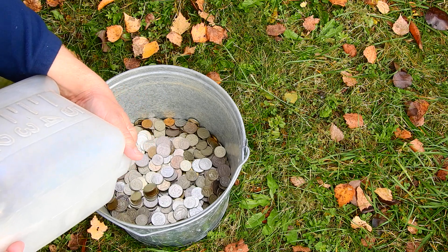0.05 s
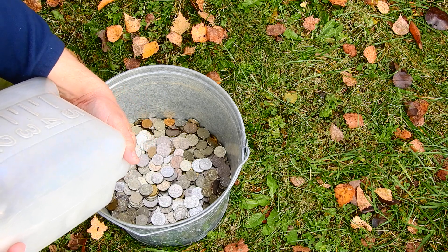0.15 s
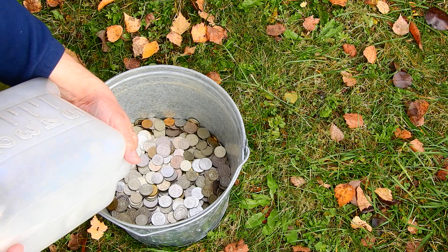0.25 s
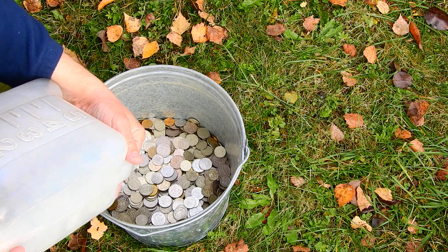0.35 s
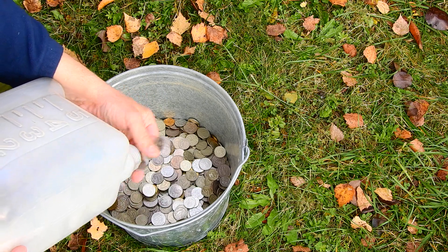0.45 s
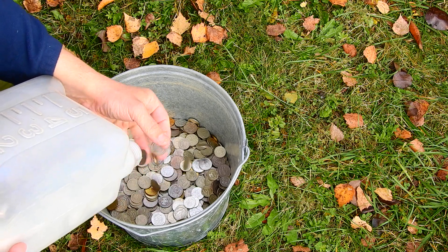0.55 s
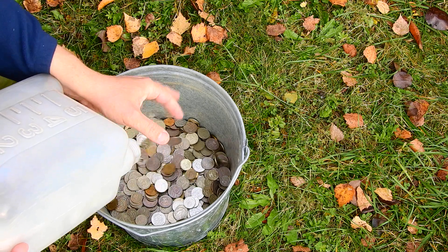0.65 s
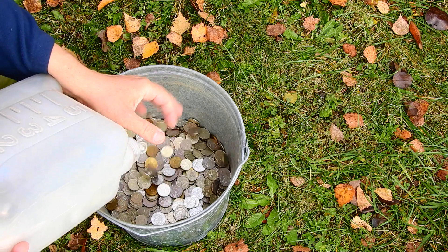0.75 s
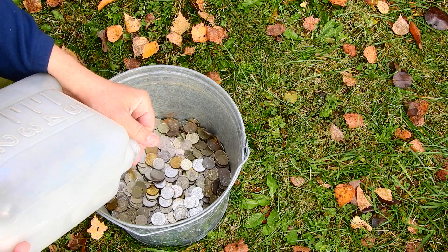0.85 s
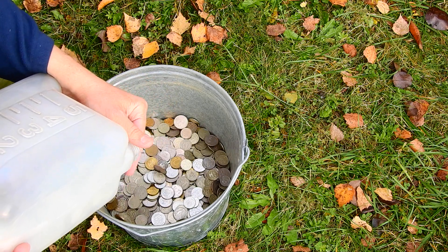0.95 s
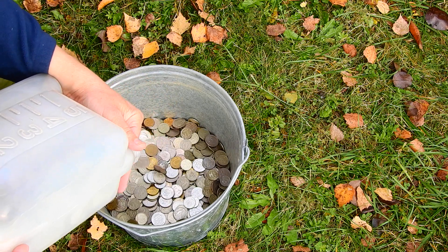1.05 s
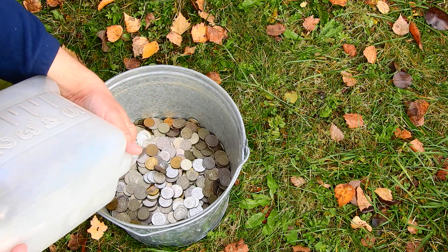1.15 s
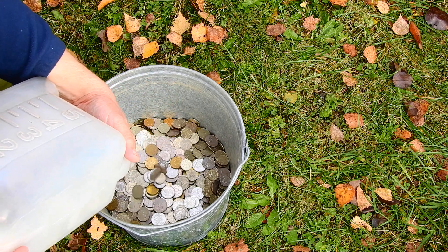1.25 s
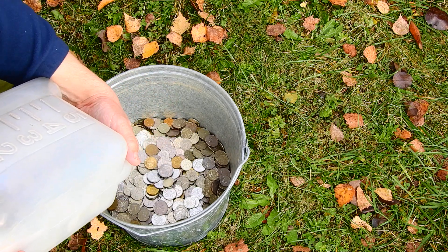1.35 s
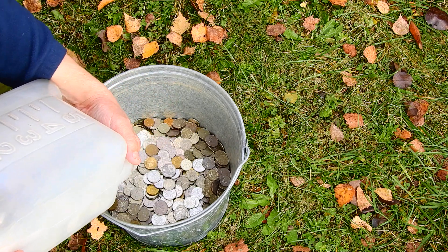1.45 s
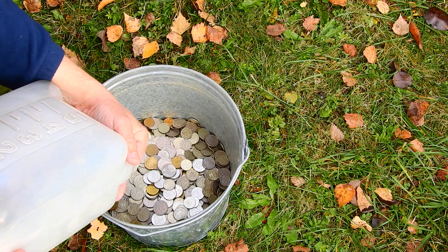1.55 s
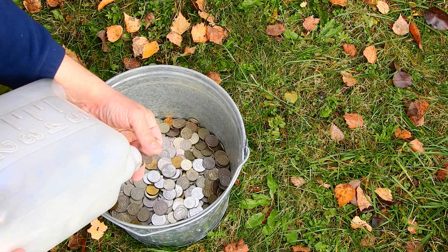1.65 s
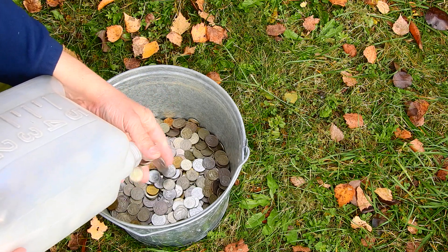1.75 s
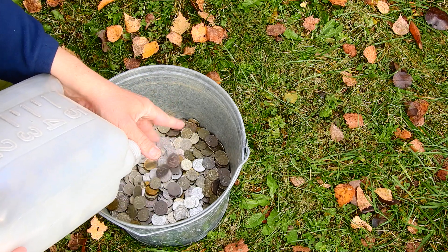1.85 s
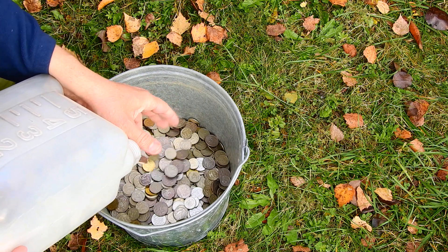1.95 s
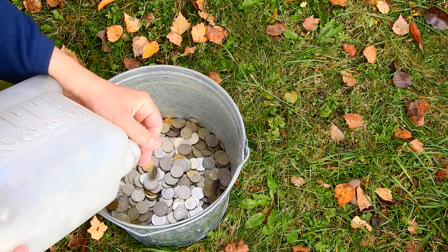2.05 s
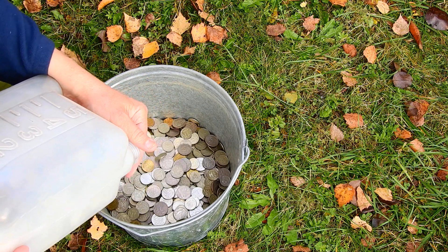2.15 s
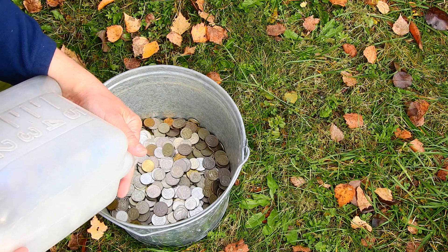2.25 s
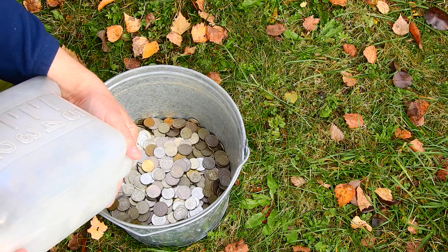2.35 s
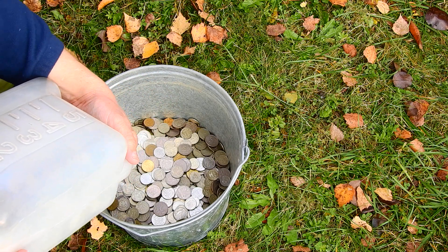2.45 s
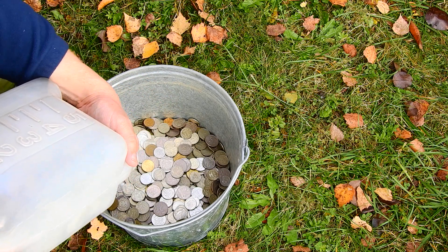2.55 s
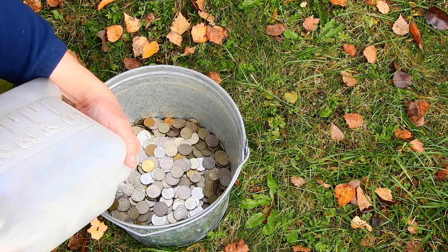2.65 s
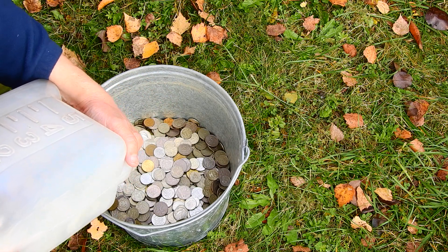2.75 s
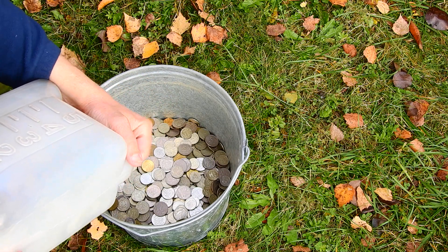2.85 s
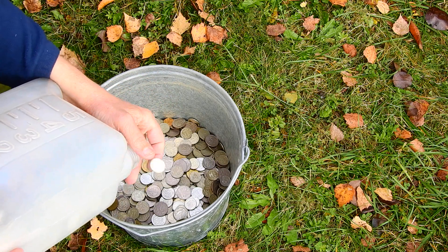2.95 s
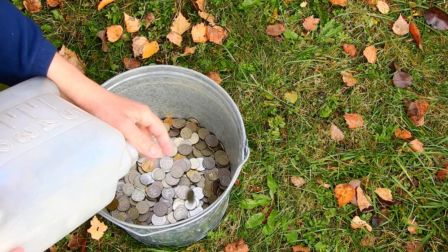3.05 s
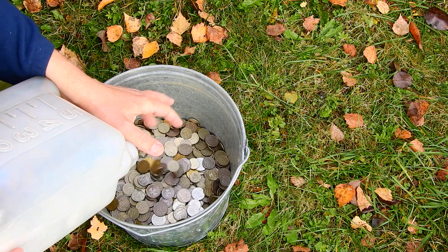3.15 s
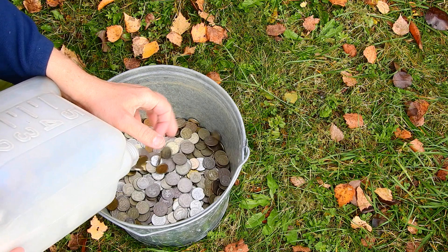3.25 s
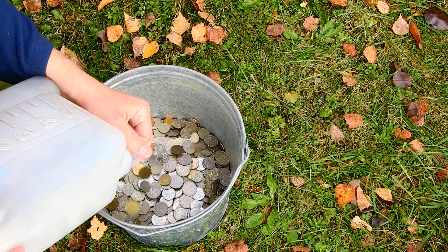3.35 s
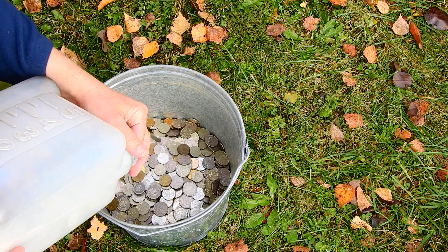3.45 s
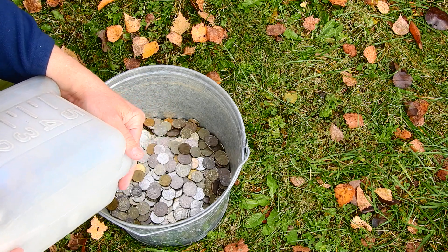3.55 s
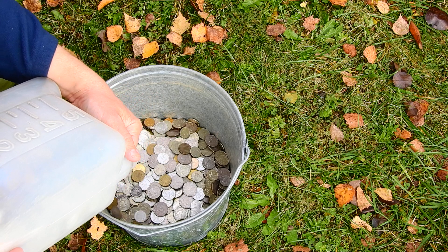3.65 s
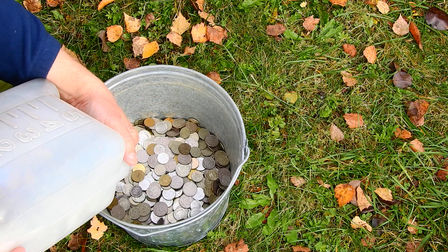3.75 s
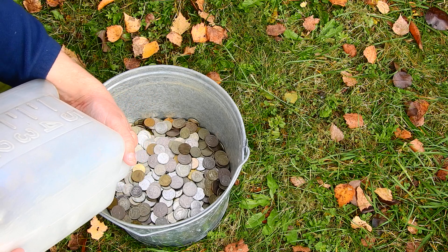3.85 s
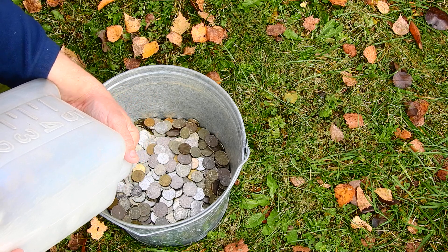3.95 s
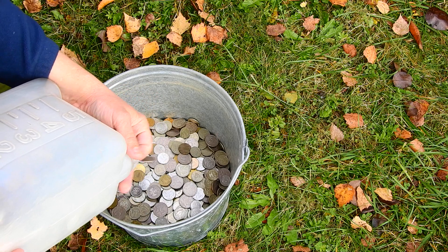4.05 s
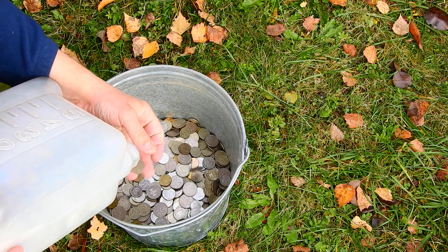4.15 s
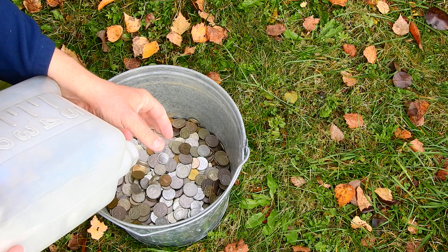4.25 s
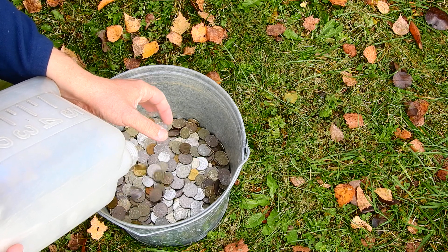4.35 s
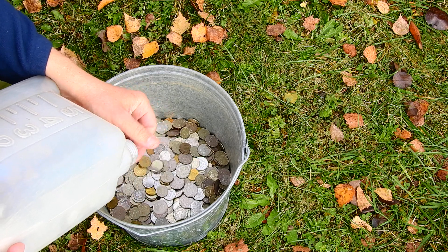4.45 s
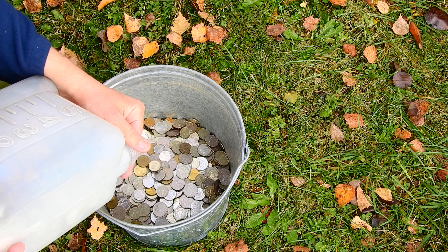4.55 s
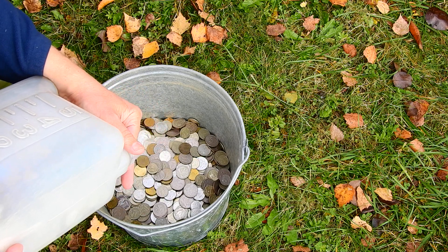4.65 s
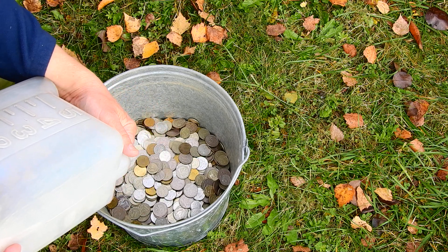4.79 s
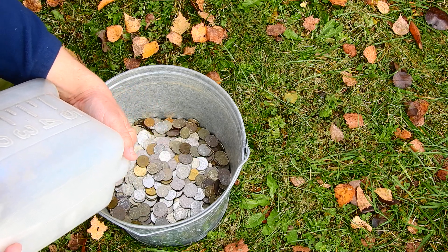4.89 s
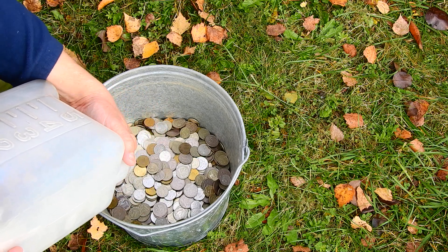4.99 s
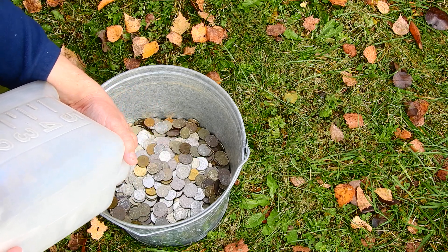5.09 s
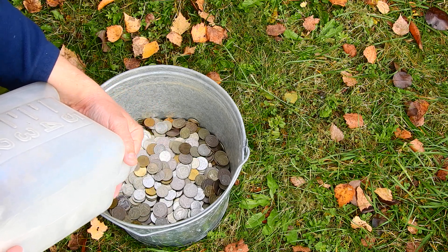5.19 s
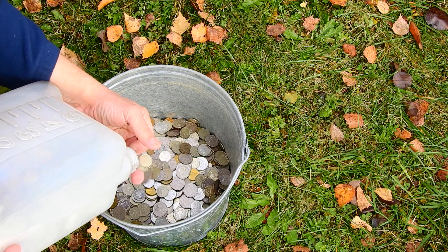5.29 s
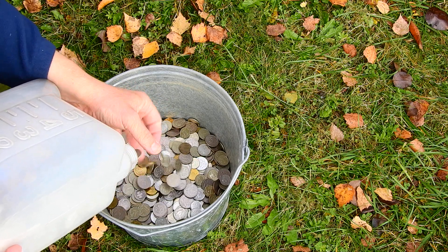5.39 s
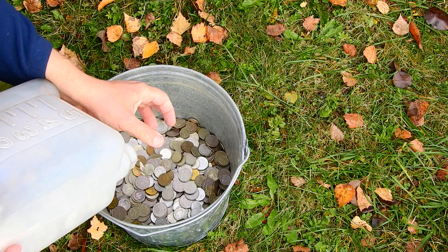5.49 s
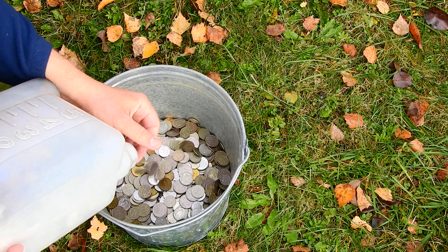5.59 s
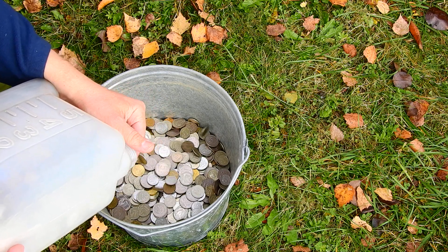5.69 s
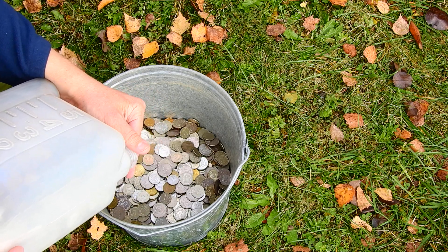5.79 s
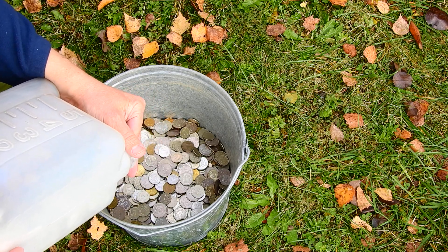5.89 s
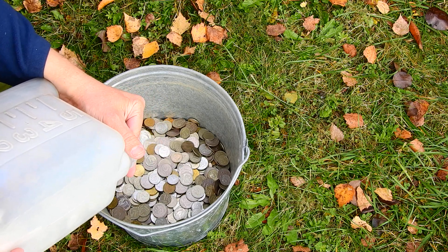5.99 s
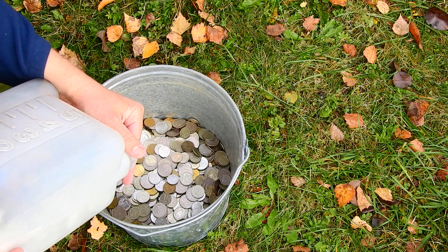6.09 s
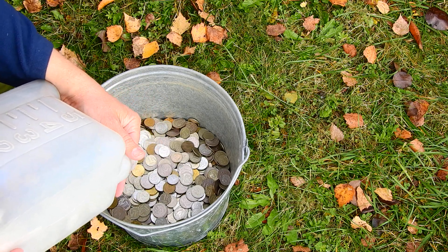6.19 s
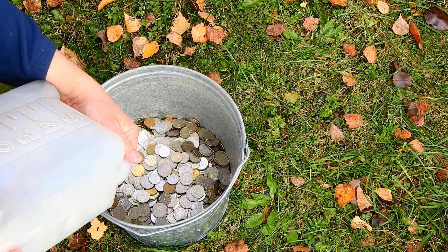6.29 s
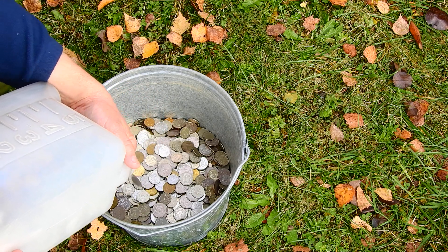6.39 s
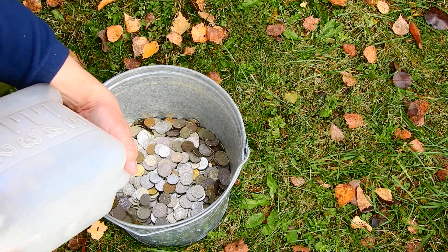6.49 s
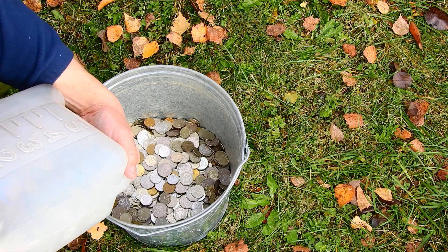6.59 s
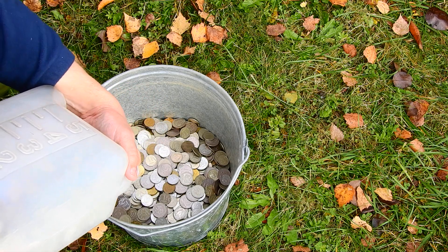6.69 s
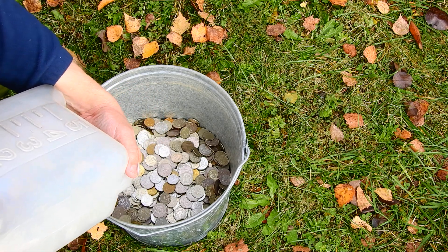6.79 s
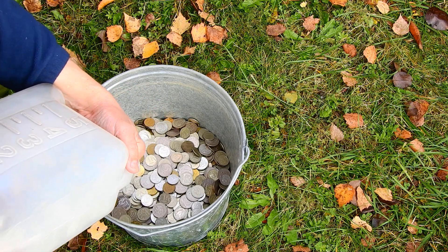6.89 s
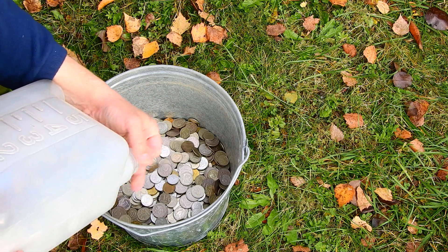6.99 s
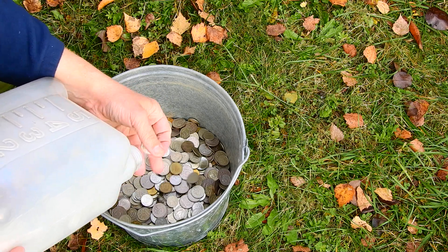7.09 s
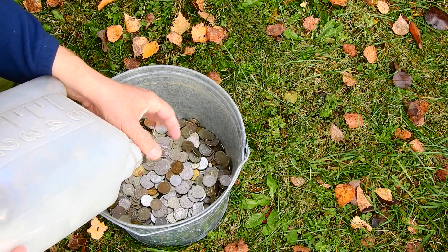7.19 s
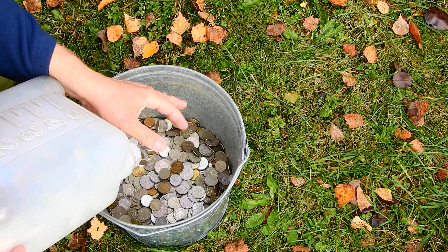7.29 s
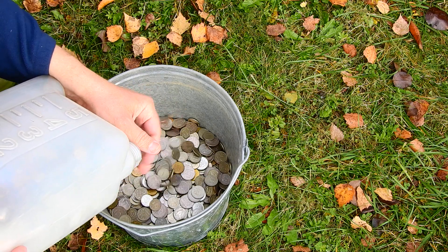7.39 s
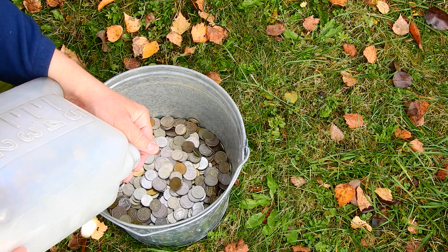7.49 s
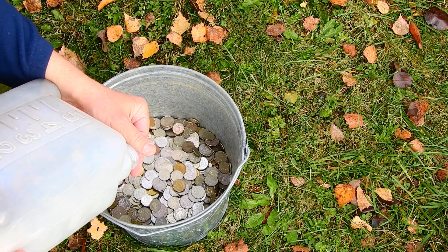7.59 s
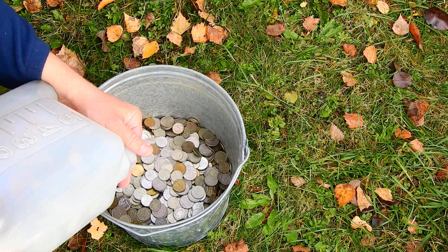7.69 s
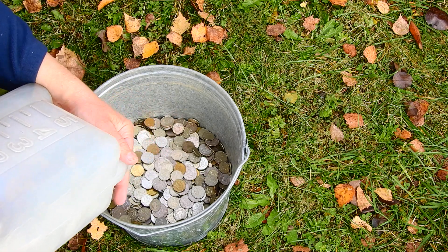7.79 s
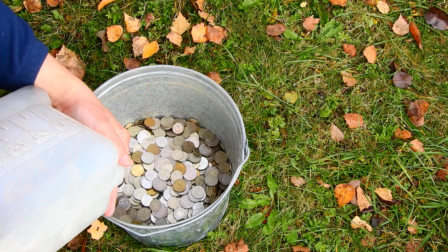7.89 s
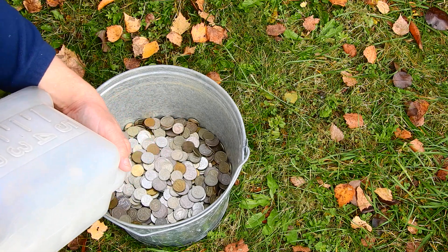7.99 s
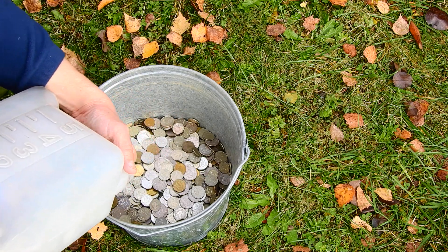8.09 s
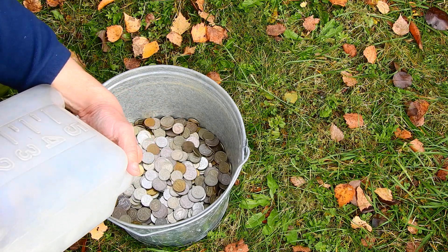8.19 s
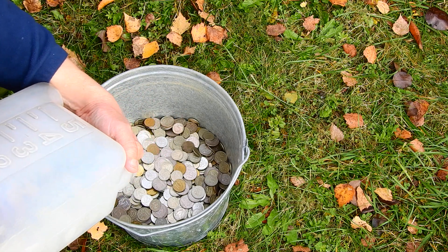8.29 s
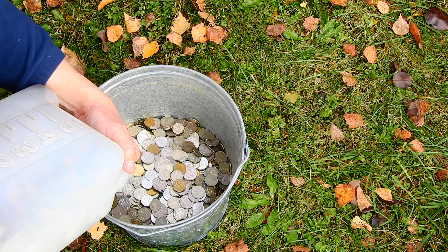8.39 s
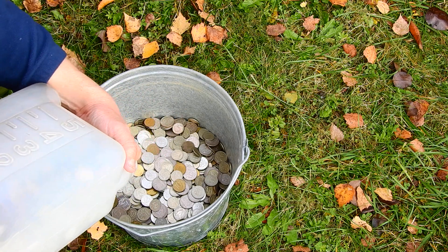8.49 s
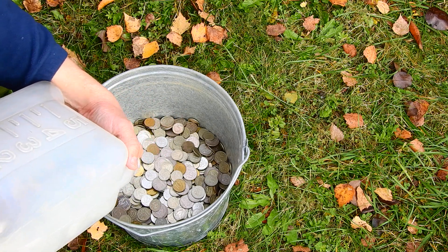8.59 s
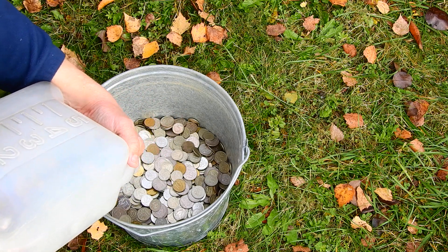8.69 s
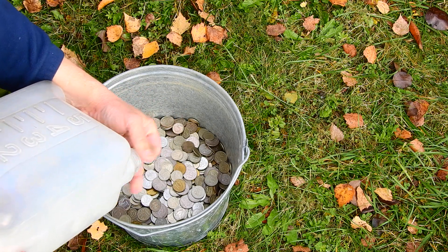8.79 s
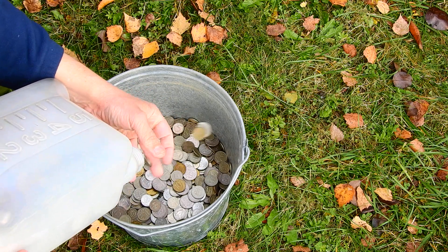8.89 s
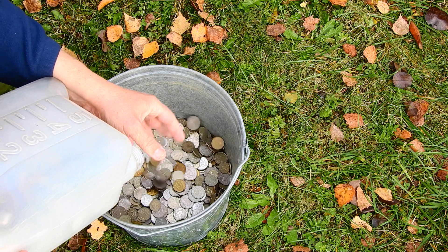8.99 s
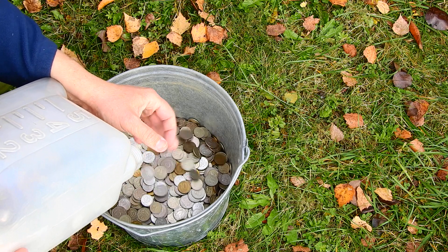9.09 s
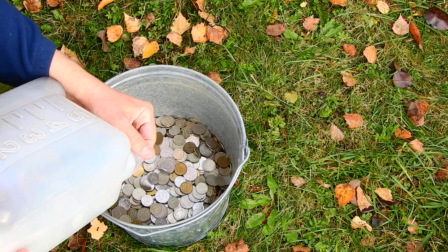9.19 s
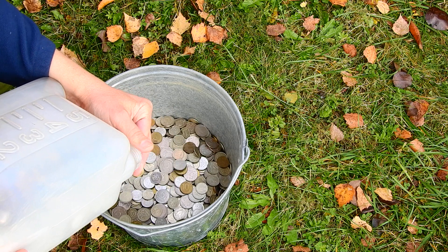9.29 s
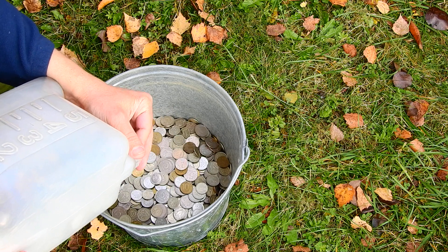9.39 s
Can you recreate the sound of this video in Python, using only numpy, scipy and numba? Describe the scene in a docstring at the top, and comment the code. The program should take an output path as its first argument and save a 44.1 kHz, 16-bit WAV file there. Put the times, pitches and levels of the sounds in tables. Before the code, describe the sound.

Close-up outdoor coin spills: dull plastic rattles and scraping strokes alternate with sharp metallic clatter and short hollow bucket thuds over faint wind.

```python
"""A hand rakes coins out of a plastic canister onto a heap in a metal bucket, close to a phone in light wind.
Dull rattle and bright clinks open it, by damped modes of plastic and coin; the spills are dense from 3.2 to 4.6 s.
From 5.4 s and from 6.5 s coins spill again, the bucket modes thudding, over wind made of filtered noise.
Scraping strokes and sparser clinks lead from 7.8 s to a last spill at 9.1 s.
Throughout, the phone delays the treble by 10.5 ms, ducks after loud peaks and clips what exceeds full scale."""
import sys
import numpy as np
from scipy import signal
from scipy.fft import rfft, irfft, next_fast_len
from scipy.io import wavfile
from scipy.ndimage import uniform_filter1d, minimum_filter1d
from numba import njit

SR = 44100
rng = np.random.default_rng(int(sys.argv[2]) if len(sys.argv) > 2 else 0)


def store_wav(level_fs):
    """Save 16-bit WAV to argv[1]."""
    pcm = np.round(np.clip(np.atleast_2d(level_fs), -1, 1) * 32767)
    wavfile.write(sys.argv[1], SR, pcm.T.astype(np.int16))


N = 416304  # length in samples


def undb(db):
    """Decibel law: the amplitude gain of a level."""
    return 10 ** (np.asarray(db) / 20)


def level(x, db):
    """Root-mean-square scaling: brings a signal to an rms level."""
    return x * undb(db) / np.sqrt(np.mean(x ** 2))


def shape(table, hz):
    """Spectral envelope: dB at the given frequencies, interpolated over log frequency."""
    table_hz, table_db = np.transpose(table)
    return np.interp(np.log(hz), np.log(table_hz), table_db)


@njit
def add(out, start, pole, left, right, length, soft):
    """Modal superposition: sums decaying sines, weighted per port, with a gradual contact onset."""
    for k in range(len(start)):
        z, gap = 1 + 0j, 1.
        for i in range(max(start[k], 0), min(start[k] + length[k], out.shape[1])):
            gap *= soft
            onset = (1 - gap) ** 2
            out[0, i] += (z * left[k]).imag * onset
            out[1, i] += (z * right[k]).imag * onset
            z *= pole[k]
    return out


def ring(s, hz, db, t60, lean_db=2.0, lag_us=8.6, contact_s=.00008):
    """Impact excitation: blows (rows) ring modes (columns), each blow at its own place between the ports."""
    place = rng.standard_normal((len(s), 2))  # one draw for the time lag, one for the level tilt
    hz, t60 = np.clip(hz, 50, .45 * SR), np.clip(t60, .001, 1)
    s, hz, db, t60 = np.broadcast_arrays(s[:, None], hz, db, t60)
    turn = np.pi * hz * 1e-6 * lag_us * place[:, :1]  # half the phase lag goes to each port
    # on average the treble favours the left port
    tilt = lean_db * np.clip(hz / 2500, 0, 1) * (1 + 0.72 * place[:, 1:]) / 2
    gain = undb(db) * np.exp(2j * np.pi * rng.random(hz.shape))
    left = gain * undb(tilt) * np.exp(1j * turn)
    right = gain * undb(-tilt) * np.exp(-1j * turn)
    pole = np.exp((2j * np.pi * hz - np.log(1000) / t60) / SR)  # falls 60 dB in t60
    start, length = (s * SR).astype(np.int64), (t60 * SR).astype(np.int64)
    rows = start, pole, left, right, length
    soft = np.exp(-1 / (contact_s * SR))
    return add(np.zeros((2, N)), *(np.ravel(r) for r in rows), soft)


def scatter(lo_hz, hi_hz, table, blows, count):
    """Modal density: random modes for each blow, crowded towards the low end and weighted by a spectrum."""
    hz = lo_hz + (hi_hz - lo_hz) * rng.random((blows, count)) ** 1.329
    return hz, shape(table, hz)


def stream(count, spread_db, curve, lag_s=0.):
    """Random impact process: blows at uniform random times, many weak and few strong, follow a level curve."""
    chance = rng.random((count, 2))
    s = chance[:, 0] * N / SR
    curve_db = np.interp(s + lag_s, *np.transpose(curve))
    db = curve_db - spread_db * np.log(1 - .985 * chance[:, 1])
    return s, db[:, None]


def chatter(s, db, span_s, fall_db, count):
    """Dissipation by repeated impacts: each blow is followed by ticks that weaken on average."""
    chance = rng.random((len(s), 2, count))
    late = chance[:, 0] ** 1.5
    db = db[:, None] - fall_db * late - 3.5 * np.log(1 - .95 * chance[:, 1])
    return np.ravel(s[:, None] + span_s * late), np.ravel(db)[:, None]


def swell(rows, rise_db_s, fall_db_s):
    """Power addition: at 200 steps a second, each row rises to its start, holds and dies away."""
    s, length, db = np.transpose(rows)[:, :, None]
    t = np.arange(0, N / SR, 1 / 200)
    before_db = rise_db_s * np.maximum(s - t, 0)
    after_db = fall_db_s * np.maximum(t - s - length, 0)
    return np.sum(undb(db - before_db - after_db) ** 2, axis=0)


def curve_of(power):
    """Level of a power: rows of seconds and dB, with a floor near -70 dB."""
    return np.transpose([np.arange(len(power)) / 200, 10 * np.log10(power + 1e-7)])


def noise(table):
    """Spectral shaping: independent white noise on each port takes on the given spectrum."""
    hz = np.maximum(np.arange(N // 2 + 1) * SR / N, 1)
    return irfft(rfft(rng.standard_normal((2, N))) * undb(shape(table, hz)), N)


# Course of the wind rumble. Each row: time in seconds, relative level in dB.
WIND_COURSE = [(0.0, -61), (0.39, -68), (0.84, -49), (1.08, -67), (4.84, -59.5), (6.2, -59.5),
               (6.81, -56.5), (7.02, -51), (7.62, -63.5), (8.07, -63), (8.28, -51), (8.47, -55),
               (8.65, -57), (9.44, -72)]
# Spectrum of the steady air hiss. Each row: frequency in Hz, relative spectral density in dB.
AIR_SPECTRUM = [(88, -25), (150, -15), (217, 21), (812, 16.5), (1570, 11), (3000, 9.5), (6500, 9),
                (15500, -59)]
AIR_DB = -51.5  # rms level of the hiss


def outdoors():
    """Turbulence noise: gusts rumble independently on each port, over a faint steady hiss."""
    rumble = level(noise([(15, -52), (55, 4.5), (110, -0.5), (170, -11.5), (400, -38)]), 7.5)
    steps = np.repeat(rng.standard_normal((2, N // 2000 + 1)), 2000, axis=1)
    gusts_db = 5 * uniform_filter1d(steps, 2000)[:, :N]
    lean_db = np.array([[1.5], [-1.5]])  # the left port is more exposed
    wind_db = np.interp(np.arange(N) / SR, *np.transpose(WIND_COURSE))
    air = noise(AIR_SPECTRUM)
    hiss = level(air + .5 * air[::-1], AIR_DB)  # the ports share part of the hiss
    return rumble * undb(wind_db + gusts_db + lean_db) + hiss


# Single puffs on the ports. Each row: start in seconds, relative level in dB, frequency in Hz.
PORT_PUFFS = [(0.646, -13, 86.1), (3.977, -21, 73), (4.927, -17.5, 108), (6.4, -12.5, 81), (6.912, -19, 74),
              (8.5, -15, 112)]


def puffs():
    """Damped pressure oscillation: a puff presses one port harder than the other for a few cycles."""
    s, db, hz = np.transpose(PORT_PUFFS)
    return ring(s, hz[:, None], db[:, None], 0.078, contact_s=0.0096) * np.array([[1.3], [.4]])


# Handfuls spilling onto the heap. Each row: start in seconds, length in seconds, relative clatter level in dB.
COIN_SPILLS = [(0.129, 0.1, -26), (0.551, 0.09, -23.5), (0.708, 0.35, -16), (1.31, 0.12, -20.5),
               (1.693, 0.12, -29), (1.894, 0.28, -15.5), (2.38, 0.075, -23.5), (3.18, 0.53, -18.5),
               (3.79, 0.43, -33.5), (4.306, 0.3, -19.5), (4.652, 0.037, -28.5), (5.433, 0.39, -16.5),
               (6.285, 0.084, -43), (6.456, 0.055, -37.5), (6.599, 0.055, -26), (7.09, 0.22, -26),
               (7.389, 0.16, -15), (9.068, 0.3, -14)]
SPILL_RISE_DB_S, SPILL_FALL_DB_S = 614, 181
# Strokes of the hand through the coins in the canister.
# Each row: start in seconds, length in seconds, relative rattle level in dB.
HAND_STROKES = [(0, 0.052, -35), (.08, 0.068, -30.5), (.28, 0.1, -28), (.43, 0.14, -29.5),
                (1.12, 0.14, -27.5), (1.39, 0.12, -24.5), (1.56, 0.16, -28.5), (2.3, 0.21, -34),
                (2.56, 0.26, -30.5), (2.85, 0.17, -25), (3.07, 0.063, -28.5), (4.8, 0.13, -37.5),
                (5.0, 0.12, -31), (5.25, 0.14, -26.5), (6.5, 0.067, -41), (6.73, 0.29, -32.5),
                (7.03, 0.15, -27), (7.765, 0.012, -42), (7.86, 0.073, -37), (8.06, 0.15, -34),
                (8.33, 0.087, -26), (8.48, 0.064, -24.5), (8.65, 0.036, -38.5), (8.815, 0.061, -27),
                (8.895, 0.049, -20.5)]
STROKE_RISE_DB_S, STROKE_FALL_DB_S = 598, 262
STIR_DB = -8  # clatter that a stroke stirs up, against its rattle
MOUTH_UNDER_DB, MOUTH_TOP_DB = -1, -35  # rattle at the canister mouth: against the spill's clatter, at most


def clatter():
    """Energy summation on the heap: every spill, and a little with every stroke."""
    strokes = swell(HAND_STROKES, STROKE_RISE_DB_S, STROKE_FALL_DB_S)
    spills = swell(COIN_SPILLS, SPILL_RISE_DB_S, SPILL_FALL_DB_S)
    return curve_of(spills + undb(STIR_DB) ** 2 * strokes)


def rattle():
    """Energy summation in the canister: every stroke, and the coins that slide out during a spill."""
    s, length, db = np.transpose(COIN_SPILLS)
    mouth = np.transpose([s, length, np.minimum(db + MOUTH_UNDER_DB, MOUTH_TOP_DB)])
    strokes = swell(HAND_STROKES, STROKE_RISE_DB_S, STROKE_FALL_DB_S)
    return curve_of(strokes + swell(mouth, SPILL_RISE_DB_S, SPILL_FALL_DB_S))


# Modes of the bucket. Each row: nominal frequency in Hz, relative level in dB, 60 dB decay time in seconds.
BUCKET_MODES = [(329.5, 4.5, 0.054), (493.7, 11, 0.024), (560, 11.5, 0.021)]


def bucket(s, db):
    """Heavily damped resonance: the loaded metal wall and the air in it answer with a short hollow thud."""
    hz, mode_db, t60 = np.transpose(BUCKET_MODES)
    chance = rng.standard_normal((len(s), 2, len(hz)))
    hz = hz * (1 + 0.025 * chance[:, 0])
    return ring(s, hz, db + mode_db + 0.94 * chance[:, 1], t60[None], contact_s=0.002)


def bucket_rumble():
    """Sustained random excitation: many small blows make the bucket rumble with the clatter."""
    s, db = stream(1800, 3.7, clatter(), lag_s=TREBLE_LAG_S)
    return bucket(s, 0.75 * db - 24.5)


# Colour of a knock. Each row: frequency in Hz, relative level in dB.
KNOCK_COLOUR = [(300, -9), (1500, -1.5), (3500, 1), (6000, -5), (12000, -17)]


def knocks(s, db, centre_hz):
    """Broad modal impact: a dull knock round its centre pitch, then a short chatter."""
    hz = centre_hz[:, None] * np.exp(0.708 * rng.standard_normal((len(s), 24)))
    out = ring(s, hz, db[:, None] + shape(KNOCK_COLOUR, hz) - 8.0, .008)
    s, db = chatter(s, db, .012, 1.1, count=6)
    hz, colour_db = scatter(478, 5890, KNOCK_COLOUR, len(s), count=8)
    return out + ring(s, hz, db + colour_db - 20.5, 0.021)


# Colour of coins heard through plastic. Each row: frequency in Hz, relative level in dB.
PLASTIC_COLOUR = [(300, -39), (700, 0), (1400, 3), (2500, 0), (4200, -4), (6400, 2), (9000, -17),
                  (14000, 19.5)]
# Coins knocking the canister wall. Each row: start in seconds, relative level in dB, centre frequency in Hz.
WALL_KNOCKS = [(.12, -13, 2520), (.148, -19, 2250), (0.179, -16.5, 1170), (.298, -25, 1600),
               (.32, -13.5, 1810), (.352, -14.5, 1720), (.434, -16, 1620), (.541, -12.5, 2420),
               (.635, -15, 2560), (1.243, -20, 1540), (1.408, -9.5, 1340), (1.472, -13.5, 1760),
               (1.567, -18, 2900), (1.776, -18, 2620), (2.327, -18, 2900), (2.694, -15, 1390),
               (2.856, -21, 1680), (3.109, -19, 2390), (3.36, -19, 2740), (3.923, -11, 3020),
               (5.04, -17, 1800), (5.118, -16.5, 2090), (5.243, -21.5, 1860), (5.35, -10, 1640),
               (5.403, -17, 1800), (6.513, -23, 3300), (6.723, -25, 1990), (6.85, -13, 2780),
               (6.872, -25, 2300), (6.905, -13, 2850), (7.126, -8.5, 1620), (7.237, -8, 3400),
               (8.188, -19.5, 1290), (8.784, -13.5, 2180), (8.817, -15.5, 1300), (9.004, -16, 880)]
FLURRY_DB = 4  # spread of the random level, before it is averaged over 15 ms into flurries


def canister():
    """Damped wall radiation: coins slide and tick behind the plastic, with louder knocks among them."""
    curve = rattle()
    flurries = uniform_filter1d(rng.standard_normal(curve.shape), size=3, axis=0)
    curve = curve + [0, FLURRY_DB] * flurries  # only the level column varies
    s, db = stream(8000, 3.37, curve)
    hz, colour_db = scatter(290, 9760, PLASTIC_COLOUR, len(s), count=6)
    slide = ring(s, hz, db + colour_db - 11.5, 0.015)
    s, db = stream(1100, 3.57, curve)  # single ticks of many modes stand out of the slide
    hz, colour_db = scatter(283, 9820, PLASTIC_COLOUR, len(s), count=24)
    ticks = ring(s, hz, db + colour_db - 10.5, 0.011)
    return slide + ticks + knocks(*np.transpose(WALL_KNOCKS))


# Coins that ring out clearly, timed as heard after the treble lag.
# Each row: start in seconds, frequency in Hz, level in dB.
CLEAR_RINGS = [(0.961, 8760, -5), (.972, 9000, -19), (.972, 14700, -22), (1.398, 12740, -16),
               (1.905, 14560, -22), (5.455, 9670, -10), (7.407, 9500, -23), (8.999, 10150, -19),
               (9.203, 8910, -9.5)]


def ringers():
    """Free vibration: a coin spinning free sings one clear note."""
    s, hz, db = np.transpose(CLEAR_RINGS)
    return ring(s - TREBLE_LAG_S, hz[:, None], db[:, None], 0.14, contact_s=0.0032)


# Kinds of coin. Each row: nominal frequency in Hz, relative level in dB, nominal 60 dB decay time in seconds.
COIN_KINDS = [(8620, 0, .14), (9070, -2, .12), (9500, -5, .1), (9800, -3, .15), (10200, -4, .18),
              (12700, -17, .12), (14600, -14, .15), (15000, -14, .15)]


def free_coins(s, db, share):
    """Beating modes: a share of the blows lets a coin ring near its kind's note, with varied damping."""
    chance = rng.random((len(s), 4))
    kind = (chance[:, 0] * len(COIN_KINDS)).astype(int)
    hz, coin_db, t60 = np.array(COIN_KINDS)[kind].T
    free = chance[:, 1] < share
    hz = hz * (1 + .028 * (chance[:, 2] - .5))
    t60 = t60 * (.45 + chance[:, 3] ** 2)
    # a worn coin beats between two notes at most half a percent apart
    pair_hz = hz[:, None] * (1 + [0, .005] * chance[:, 1:2] / share)
    pair_db = db[free] + coin_db[free, None] - 2.5
    return ring(s[free], pair_hz[free], pair_db, t60[free, None], contact_s=0.000098)


# Colour of coin on coin. Each row: frequency in Hz, relative level in dB.
CLINK_COLOUR = [(2500, -36), (4500, -23), (6600, -4), (8000, -16), (10300, -23.5), (11500, -29),
                (13500, -41.5), (15500, -37)]


def heap():
    """Contact damping: dense coin-on-coin ticks die within milliseconds; a few modes ring longer."""
    s, db = stream(15000, 4.06, clatter(), lag_s=TREBLE_LAG_S)
    hz, colour_db = scatter(2465, 15470, CLINK_COLOUR, len(s), count=6)
    t60 = 0.0018 + 0.026 * rng.random(hz.shape) ** 3
    ticks = ring(s, hz, db + colour_db + 2.5, t60)
    free = free_coins(s, 1.366 * np.minimum(db, -10.0) - 3.5, 0.14)
    s, db = stream(900, 2.8, clatter(), lag_s=TREBLE_LAG_S)  # sharp single cracks stand out
    hz, colour_db = scatter(2470, 15740, CLINK_COLOUR, len(s), count=30)
    return ticks + free + ring(s, hz, db + colour_db + 10.5, 0.0045)


# Single coins landing, timed by their treble as heard.
# Each row: start in seconds, then relative levels of clink, knock and bucket thud in dB.
COIN_LANDINGS = [(0.1048, 4.5, -19.5, -12.5), (0.283, -6, -19, -37), (0.5654, 4.5, -14, -15.5),
                 (0.684, 8, -10, -25), (.698, 3, -22, -31), (0.7332, 7, -9.5, -38), (0.7429, 2, -26, -22.5),
                 (.78, 3, -21, -19.5), (0.8018, 7.5, -13.5, -48), (0.863, 8, -27, -29),
                 (0.8912, 0.5, -23, -52), (0.962, 0, -22, -19.5), (1.0404, 7.5, -7.5, -50),
                 (1.052, 8.5, -36, -56), (1.153, -0.5, -21, -18.5), (1.1635, 6, -29, -36),
                 (1.296, 6, -19, -17), (1.37, 5, -21, -17.5), (1.503, -6.5, -5.5, -28.5),
                 (1.8805, 3.5, -24, -18), (1.944, 4.5, -31, -14), (2.141, -17, -38, -19),
                 (2.1536, 2, -39, -23), (2.169, -6, -38, -31), (2.1838, -0.5, -34, -29),
                 (2.2258, 4, -24, -29), (2.2885, 4.5, -6, -55), (2.3777, 5, -21, -29),
                 (2.502, -3.5, -26, -35), (2.629, -26, -14, -22.5), (3.1798, -2.5, -29, -21),
                 (3.188, -11, -32, -33), (3.2269, 3, -12.5, -11.5), (3.2565, 7, -24, -22),
                 (3.283, 10, -22, -26), (3.299, 0, -24, -18), (3.3265, 4.5, -15, -16),
                 (3.371, 11.5, -29, -18), (3.409, -2.5, -24, -25), (3.425, 2.5, -14, -15),
                 (3.447, 5, -19, -24), (3.491, 7, -2.5, -24), (3.5539, 4.5, -7.5, -25),
                 (3.583, 3, -12, -21), (3.645, 10, -7.5, -48), (3.8668, 0.5, -21.5, -24),
                 (3.9452, 1, -15, -49), (4.0117, 0, -12.5, -45), (4.061, 10, -5, -28.5),
                 (4.163, -3.5, -17.5, -53), (4.2842, 9, -12.5, -18.5), (4.3588, 3.5, -26, -11.5),
                 (4.4346, 8, -40, -24), (4.598, 6.5, -30, -17.5), (5.437, 4.5, -18, -20.5),
                 (5.509, -7, -21, -17), (5.529, 2, -23, -20), (5.554, 6.5, -23, -25),
                 (5.6322, 7, -18.5, -16), (5.7123, 2, -21, -16.5), (5.7627, -2, -28, -24.5),
                 (5.81, 4, -10.5, -36), (5.861, 2, -30.5, -37), (5.891, 1.5, -25.5, -27),
                 (6.571, 3.5, -34, -19.5), (6.736, -3.5, -17, -45), (7.1705, 4.5, -31, -16),
                 (7.2393, 7, -17, -24), (7.2475, 9, -30, -46), (7.313, 0, -18, -52),
                 (7.3244, 1.5, -29, -49), (7.385, 4, -13, -16), (7.453, -2, -37, -41),
                 (7.4769, 8, -23, -20), (7.624, -2.5, -32, -28), (7.872, -12, -17.5, -23.5),
                 (8.1187, -12, -23.5, -41), (8.1505, -6.5, -16.5, -28), (8.434, -24, -13, -28),
                 (8.8346, -7, -17, -54), (8.9012, -7, -5, -32), (9.0296, 8.5, 2.5, -50),
                 (9.0943, -3, -23, -19), (9.1047, 6, -16.5, -27), (9.1305, 5.5, -24, -32),
                 (9.2524, 7, -13, -19.5), (9.323, 0.5, -19.5, -18.5)]
LANDING_KNOCK_HZ, KNOCK_AFTER_S = 3045, 0.002


def landings():
    """Impact and settling: each coin cracks on the heap, knocks, chatters to rest and thuds the bucket."""
    s, db, knock_db, thud_db = np.transpose(COIN_LANDINGS)
    s = s - TREBLE_LAG_S
    hz, colour_db = scatter(2610, 15390, CLINK_COLOUR, len(s), count=40)
    cracks = ring(s, hz, db[:, None] + colour_db, 0.0041)
    thuds = bucket(s, thud_db[:, None])
    dull = knocks(s + KNOCK_AFTER_S, knock_db, np.full(len(s), LANDING_KNOCK_HZ))
    s, db = chatter(s, db, 0.035, 10.6, count=16)
    hz, colour_db = scatter(2488, 15680, CLINK_COLOUR, len(s), count=10)
    settling = ring(s, hz, db + colour_db - 13.5, 0.021)
    return cracks + thuds + dull + settling + free_coins(s, db - 30.0, 0.092)


def scene():
    """Linear superposition: wind, bucket, canister, heap and single landings add in the open air."""
    background = outdoors() + puffs()
    vessels = bucket_rumble() + canister()
    return background + vessels + ringers() + heap() + landings()


LIMIT_DB, LIMIT_SHARE, LIMIT_HOLD_S = -2, 0.36, .012  # threshold, share of the excess taken off, hold


def limit(x):
    """Dynamic compression: just after a loud peak the gain drops, holds and glides back."""
    hold = int(LIMIT_HOLD_S * SR)
    peak = np.maximum(np.abs(x).max(axis=0), undb(LIMIT_DB))
    gain = (undb(LIMIT_DB) / peak) ** np.clip(LIMIT_SHARE, 0, 1)
    gain = minimum_filter1d(gain, hold, origin=(hold - 1) // 2)  # the origins make both windows look back
    gain = uniform_filter1d(gain, hold // 2, origin=(hold // 2 - 1) // 2)
    return x * gain


SPLIT_HZ, TREBLE_LAG_S, TOP_HZ = 4100, .0105, 15650  # the treble above the split lags; the top is cut


def record(dry):
    """Transfer function: ports differ most near 2.35 kHz, treble lags, loud peaks duck and clip, the top is cut."""
    size = next_fast_len(N + SR // 10)
    hz = np.arange(size // 2 + 1) * SR / size
    bump = np.exp(-.5 * ((hz - 2350) / 500) ** 2)
    ports = np.exp(np.array([[1], [-1]]) * bump * (0.067 + .3j))  # opposite gain and phase
    treble = 1 / (1 + np.exp(np.clip((SPLIT_HZ - hz) / 15, -50, 50)))
    late = 1 - treble + treble * np.exp(-2j * np.pi * hz * TREBLE_LAG_S)
    arrived = irfft(rfft(dry, size) * ports * late, size)[:, :N]
    heard = np.clip(limit(arrived), -1, 1)
    return signal.sosfilt(signal.ellip(12, .2, 80, TOP_HZ, fs=SR, output="sos"), heard)


dry = scene()
out = record(dry)
store_wav(out)
```